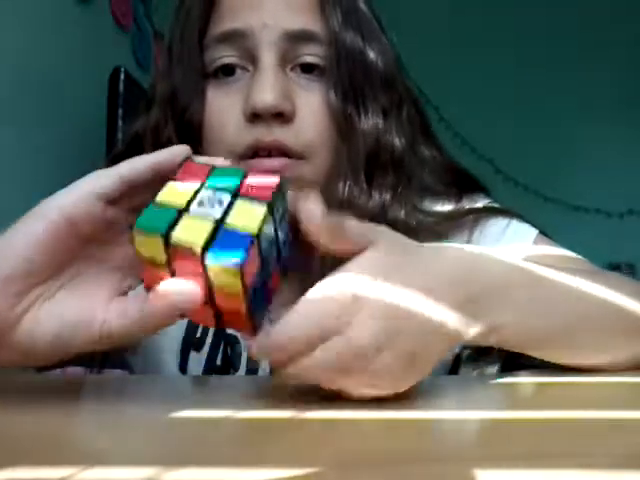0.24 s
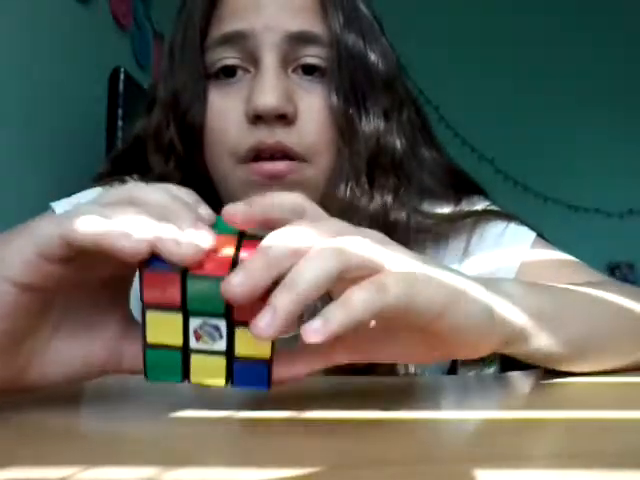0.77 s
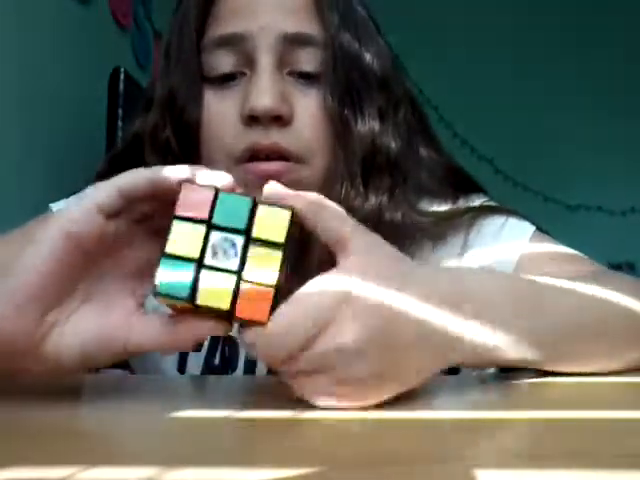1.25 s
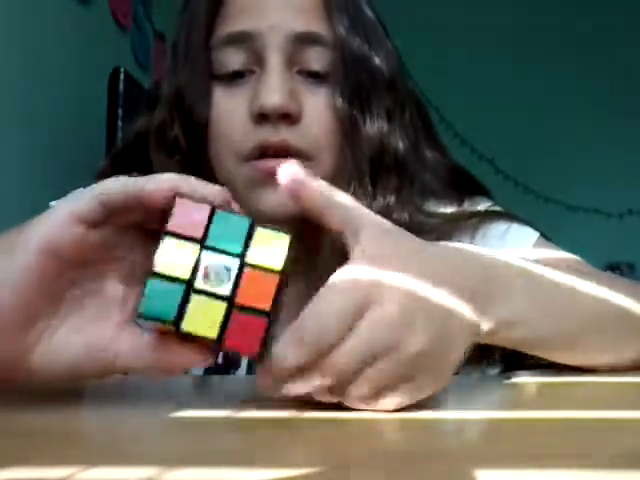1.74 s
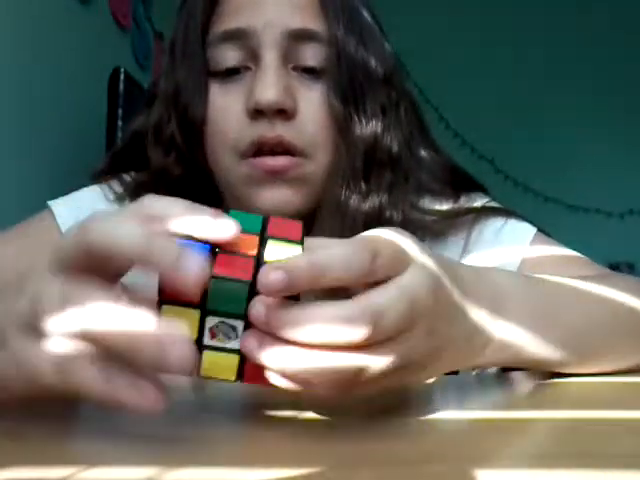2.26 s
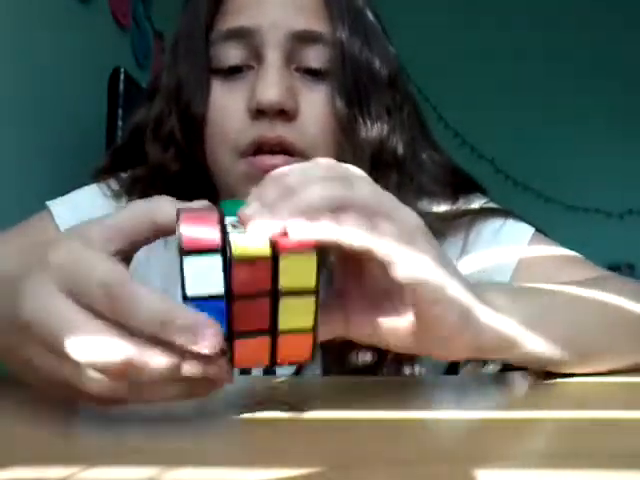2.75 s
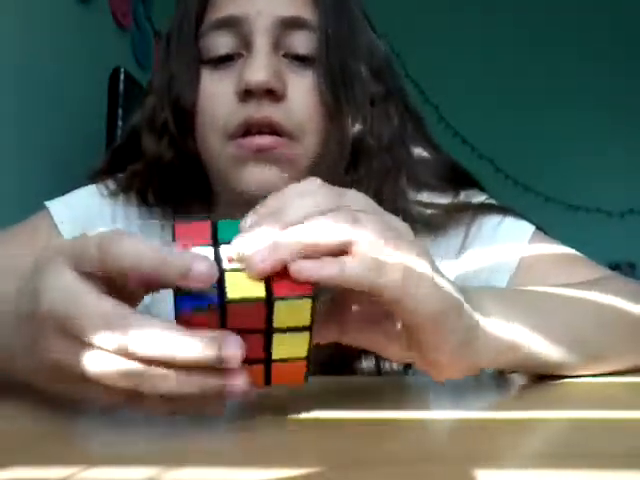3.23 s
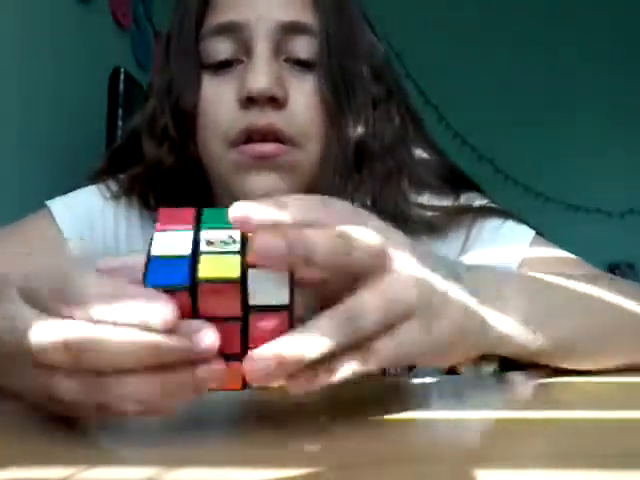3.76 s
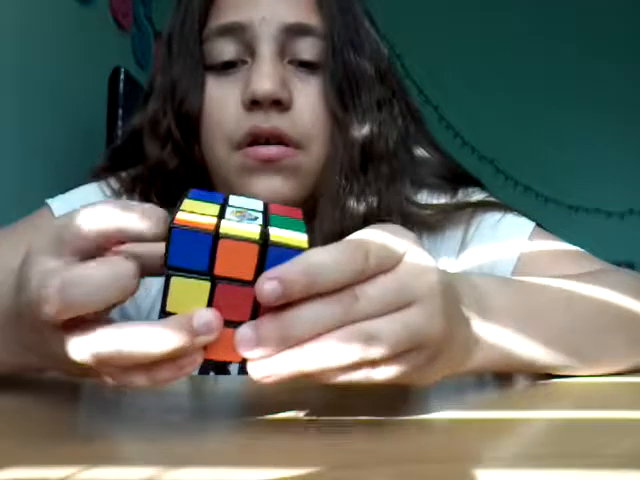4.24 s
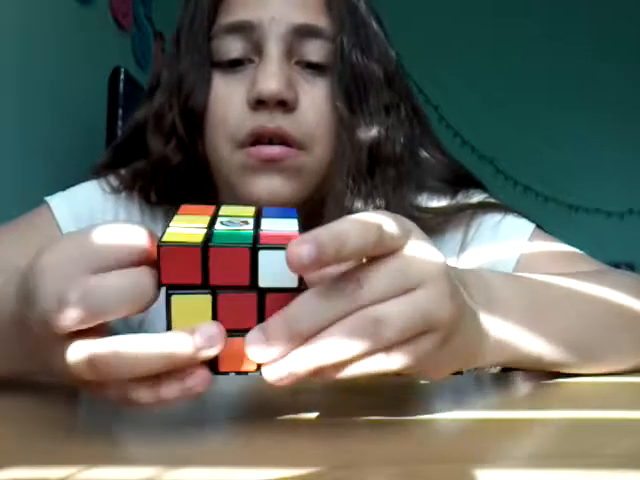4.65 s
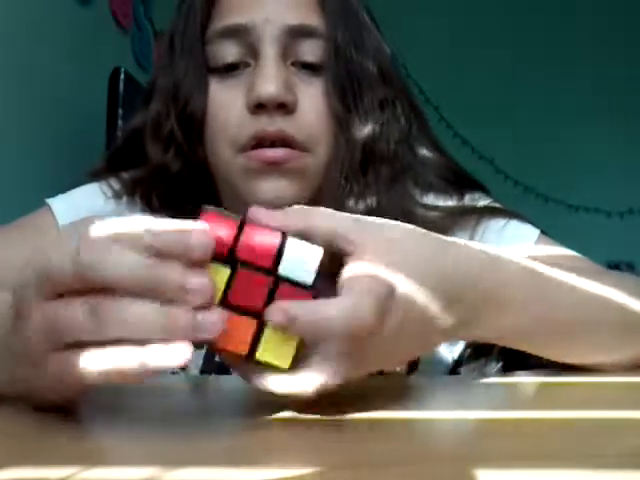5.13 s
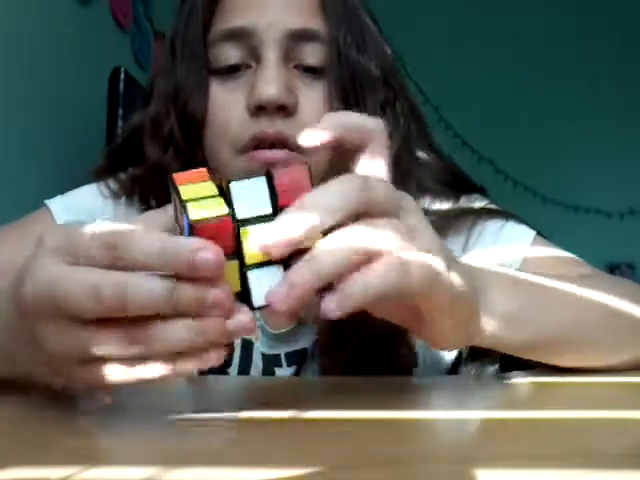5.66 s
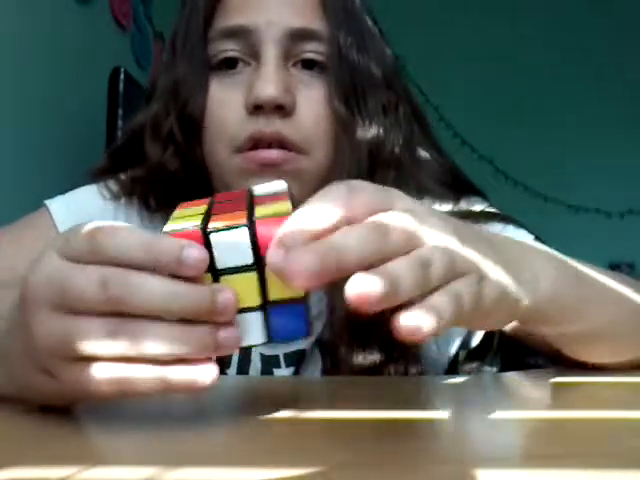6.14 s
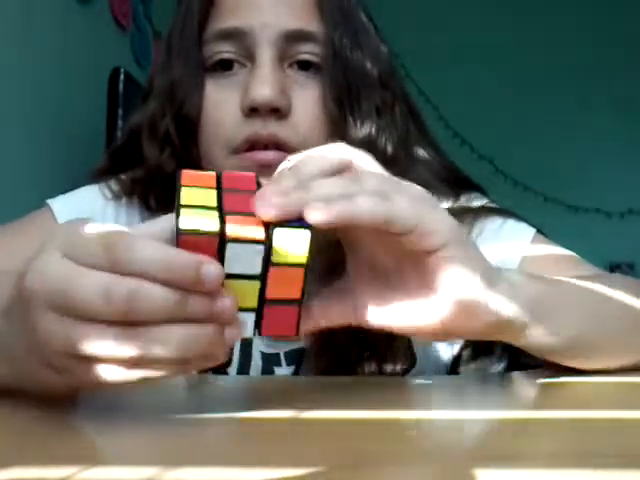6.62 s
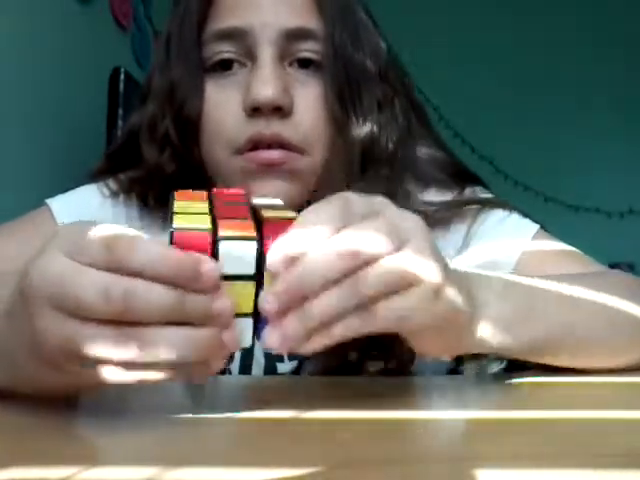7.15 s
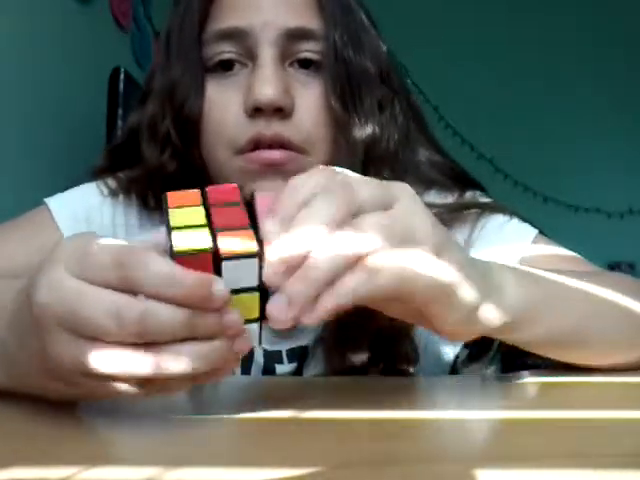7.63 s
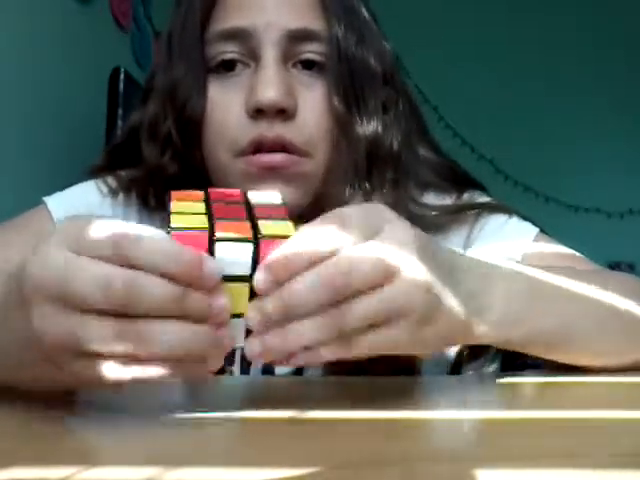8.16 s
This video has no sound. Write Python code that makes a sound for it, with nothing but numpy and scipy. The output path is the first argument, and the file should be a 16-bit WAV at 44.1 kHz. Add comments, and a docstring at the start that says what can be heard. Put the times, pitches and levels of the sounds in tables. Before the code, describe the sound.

In a small bare room with a faint rumble and hiss, a plastic puzzle cube clicks and clacks irregularly as its layers are turned near the microphone. A quick run of snaps comes early, then a dull bump on a wooden table and more turns with short, dry scrapes. After one especially hard clack the handling grows softer, with light ticks and rubs, until a sharp click at the end.

```python
"""In a small bare room, a stiff plastic puzzle cube is twisted by hand just above a wooden table, close to
a laptop's two microphones. In each turn a layer scrapes ever harder by stick-slip friction, catches with
a thin click and seats with a clack, an impact that excites the resonances of the hollow pieces.
During and between turns, pieces click and layers are nudged; soft bumps ring the table's modes under
several clacks and twice between turns. The room reverberates over a faint rumble and hiss."""
import sys
import numpy as np
from scipy import signal
from scipy.fft import rfft, irfft, next_fast_len
from scipy.io import wavfile
from scipy.ndimage import uniform_filter1d

SR = 44100
rng = np.random.default_rng(int(sys.argv[2]) if len(sys.argv) > 2 else 0)


def materialize(psi):
    """Save the field psi as 16-bit PCM at rate SR to the path in sys.argv[1].

    A 1-D psi becomes a single channel; in a 2-D psi each row is a channel.
    """
    bounded = np.clip(np.atleast_2d(psi).T, -1, 1)
    quanta = np.round(bounded * 32767).astype(np.int16)
    wavfile.write(sys.argv[1], SR, quanta)


N = 369999

# full turns of a layer: (seating time [s], slide length [s], slide level [dB], lead of the catch [s],
# catch level [dB], seat level [dB], hollow knock [dB])
TURNS = [(0.1624, 0.16, -45.5, .0049, -27, -28, 9), (1.1425, 0.061, -35.5, .0044, -27, -14, 2.5),
         (1.2982, 0.081, -32.5, .0058, -50, -15.5, 0), (1.5478, .07, -34.5, .0247, -22.5, -18, 5.5),
         (2.7594, .04, -31.5, .0068, -26, -30, 8.5), (3.6667, 0.12, -39, .0064, -19.5, -23, 11),
         (4.2373, .04, -30.5, .0067, -15, -16, 5.5), (4.68, 0.099, -36.5, .0085, -23, -16.5, 10),
         (5.5467, 0.028, -22.5, .0074, -16, -3, 0.5), (5.959, 0.066, -44, .0074, -36, -37.5, 19.5),
         (6.6025, 0.067, -32, .0094, -20.5, -25, 8.5), (7.128, 0.05, -37.5, .0301, -35, -37.5, -8),
         (8.199, 0.054, -43.5, .0187, -42.5, -35, 11.5)]
SWELL_DB = 10  # growth of a slide up to its listed level
def turns(thinning_db=-11.5):
    """Double impact: a layer catches with a thin click, then drops into line with a hollow clack."""
    out = np.zeros((2, N))
    for seat_s, _, _, lead_s, catch_db, seat_db, knock_db in TURNS:
        add(out, seat_s - lead_s, gripped_snap(catch_db, knock_db + thinning_db))
        add(out, seat_s, gripped_snap(seat_db, knock_db))
    return out


def gripped_snap(level_db, knock_db):
    """Contact stiffness: in a held layer, a softer impact excites less treble."""
    return snap(level_db, knock_db, edge_db=6 + 0.27 * level_db)


# impact spectrum of the plastic shell: (frequency [Hz], spectral level [dB])
SHELL_SPECTRUM = [(60, -30.5), (450, -18.5), (680, -12.5), (880, -8.5), (2000, -3.5), (3500, -3),
                  (5000, -1.5), (7300, -4.5), (9500, -15.5), (14500, -25.5)]
def snap(level_db, knock_db, edge_db, contact_t60=0.0036, rattle_t60=0.023, rise_s=0.00086, size=8192):
    """Impact excitation: a hard contact and a brief rattle of neighbouring pieces ring the shell."""
    t, hz = np.arange(size) / SR, np.fft.rfftfreq(size, 1 / SR)
    decay = amp(-60 * t / contact_t60) + amp(-12 - 60 * t / rattle_t60)
    force = rfft(decay * (1 - np.exp(-t / rise_s)) * rng.standard_normal((2, size)))
    # the force's broad trend is divided out, leaving only narrow peaks to chance
    trend_db = 10 * np.log10(uniform_filter1d(np.abs(force) ** 2, 201, axis=1))
    knock_band = along([(550, 0), (850, 1), (1600, 1), (3200, 0)], hz)
    edge_band = along([(6500, 0), (10000, 1)], hz)
    pitch = np.exp(0.041 * rng.standard_normal())  # no two pieces ring alike
    colour_db = along(SHELL_SPECTRUM, hz) + cavities_db(hz, pitch) + ports_db(hz)
    colour_db += knock_db * knock_band + edge_db * edge_band
    crack = unit(irfft(force * minimum_phase(colour_db - trend_db)))
    crack *= np.sqrt(0.005 * SR / size)  # the energy of 5 ms at unit power
    hollowness = 1 / (1 + amp(-knock_db))
    return amp(level_db) * (crack + hollowness * body_ring(t))


# air and wall resonances of the pieces: (frequency [Hz], bandwidth [Hz], gain [dB])
CAVITY_RESONANCES = [(918, 110, 8), (1146, 130, 5.5), (1440, 67, -0.5), (2200, 100, 2.5), (2920, 960, 2)]
def cavities_db(hz, pitch=1):
    """Cavity resonance: the hollow pieces emphasise bands around their natural frequencies."""
    return sum(db * bell(hz, centre * pitch, width) for centre, width, db in CAVITY_RESONANCES)


# modes of the whole cube: (frequency [Hz], relative level [dB], T60 [s])
BODY_MODES = [(890, -21, .05), (1020, -20, .06), (1140, -21, .055)]
def body_ring(t, rise_s=0.0018, gain_db=-2):
    """Damped free vibration: the cube rings on in the hands, its modes slightly detuned by each grip."""
    detunings = 1 + 0.005 * rng.standard_normal(len(BODY_MODES))
    phases = 2 * np.pi * rng.random((len(BODY_MODES), 2, 1))
    ring = sum(amp(db - 60 * t / t60) * np.sin(2 * np.pi * hz * detuning * t + phase)
               for (hz, db, t60), detuning, phase in zip(BODY_MODES, detunings, phases))
    return amp(gain_db) * ring * (1 - np.exp(-t / rise_s))


# clicks of loose pieces: (time [s], level [dB], hollow knock [dB])
LOOSE_CLICKS = [(0.061, -38, 8), (0.0731, -36.5, 1), (.3048, -48.5, 9), (0.3396, -51, 17),
                (.5096, -51, 11.5), (.8319, -28, 1), (1.1034, -29, 2), (1.1085, -28, 3), (1.2302, -33.5, 9),
                (1.2598, -24, -2), (1.2665, -26, 0), (1.2756, -31.5, -10), (1.4025, -33.5, 2),
                (1.4858, -34, 6), (2.058, -47.5, 4), (2.196, -34.5, 8), (2.289, -50.5, -2),
                (2.597, -48, -17), (2.6353, -34, 5), (3.339, -49, 5.5), (3.5601, -35.5, 9),
                (3.5771, -29, 2), (3.6484, -23.5, -13), (3.8692, -49.5, 8), (3.9336, -43, 4),
                (4.124, -42, 0.5), (4.2192, -23, 3), (4.6066, -30.5, 2), (4.9538, -41, 2),
                (5.1591, -45, 16.5), (5.2063, -39.5, 4), (5.2378, -40, 11), (5.4206, -48, -20),
                (5.5214, -26, -5), (6.304, -45, 6.5), (6.541, -31.5, -8), (6.5663, -27.5, -6),
                (7.21, -46.5, 8), (8.323, -14.5, -7.5)]
def loose_pieces():
    """Free impact: undamped by the fingers, a loose piece keeps its treble however softly it clicks."""
    out = np.zeros((2, N))
    for time_s, level_db, knock_db in LOOSE_CLICKS:
        add(out, time_s, snap(level_db, knock_db, edge_db=0.5))
    return out


def snags(per_turn=4, above_slide_db=3, spread_db=1):
    """Glancing impacts: edges of the pieces brush past each other at random moments of each turn."""
    out = np.zeros((2, N))
    for seat_s, length_s, slide_db, *_ in TURNS:
        remaining = (np.arange(per_turn) + rng.random(per_turn)) / per_turn
        for share, scatter_db in zip(remaining, spread_db * rng.standard_normal(per_turn)):
            level_db = slide_db + above_slide_db - SWELL_DB * share + scatter_db
            add(out, seat_s - share * length_s, gripped_snap(level_db, knock_db=5.5))
    return out


# plastic sliding on plastic: (frequency [Hz], spectral level [dB])
FRICTION_SPECTRUM = [(60, -34.5), (600, -8.5), (880, -8), (2000, -7), (3300, -7.5), (5000, -5.5),
                     (7300, -8.5), (9500, -17), (14500, -22)]
# layers nudged without seating: (start [s], end [s], mid-stroke level [dB])
NUDGES = [(-.04, 0.039, -43.5), (0.383, 0.433, -46.5), (0.978, 1.014, -47.5), (1.029, 1.058, -51.5),
          (1.377, 1.458, -44.5), (1.6, 1.804, -52), (1.854, 1.908, -56.5), (2.607, 2.711, -45),
          (2.766, 2.798, -35), (2.919, 2.983, -44.5), (2.982, 3.026, -53.5), (4.158, 4.205, -51),
          (5.193, 5.362, -55.5), (6.725, 6.763, -46), (7.126, 7.165, -44), (7.25, 7.336, -51),
          (7.376, 7.455, -55), (7.714, 7.785, -44.5), (7.827, 7.926, -52), (8.267, 8.3, -52.5)]
def scraping(fade_s=0.0098, overrun_s=0.015, nudge_arch_db=8.5):
    """Friction noise follows pressure: a turn presses ever harder, a nudge swells and eases off."""
    out, t = np.zeros((2, N)), np.arange(N) / SR
    friction = (1 + stick_slip()) * rng.standard_normal((2, N))
    rasp = filtered(friction, lambda hz: amp(along(FRICTION_SPECTRUM, hz) + cavities_db(hz) + ports_db(hz)))
    pressing = lambda progress: SWELL_DB * (progress - 1)
    easing = lambda progress: -nudge_arch_db * (2 * progress - 1) ** 2
    strokes = [(seat_s - length_s, seat_s + overrun_s, db, pressing) for seat_s, length_s, db, *_ in TURNS]
    strokes += [(start, end, db, easing) for start, end, db in NUDGES]
    for start, end, db, shape_db in strokes:
        span = (t > start - fade_s) & (t < end + fade_s)
        inside_s = np.minimum(t[span] - start, end - t[span])
        contact = np.clip((inside_s + fade_s) / (2 * fade_s), 0, 1)
        progress = np.clip((t[span] - start) / (end - start), 0, 1)
        out[:, span] += contact * amp(db + shape_db(progress)) * unit(rasp[:, span])
    return out


def stick_slip(per_s=700, spread_db=4, t60=0.005):
    """Stick-slip force: tiny random contacts of uneven size, each dying in milliseconds."""
    slips = rng.random(N) < per_s / SR
    sizes = amp(spread_db * np.minimum(rng.exponential(size=N), 2.5))
    release = amp(-60 * np.arange(SR // 20) / SR / t60)
    return unit(signal.fftconvolve(slips * sizes, release)[:N])


# modes of the wooden top: (frequency [Hz], relative level [dB], T60 [s])
TABLE_MODES = [(95, -26, .12), (245, -20, .07), (350, -9, .065), (490, -2, .028), (555, 0, .022),
               (805, -12, .04), (1465, -14, .025)]
# soft blows on the table: (time [s], level [dB])
TABLE_BUMPS = [(0.398, -37), (2.1968, -16.5), (3.667, -31.5), (4.236, -55), (4.682, -26.5), (5.546, -27.5)]
def table_bumps(rise_s=0.0022):
    """Plate vibration: soft blows ring the table's modes, a quarter cycle apart at the microphones."""
    out, t = np.zeros((2, N)), np.arange(SR // 4) / SR
    phase = np.array([[0], [np.pi / 2]])
    ring = sum(amp(db - 60 * t / t60) * np.sin(2 * np.pi * hz * t + phase) for hz, db, t60 in TABLE_MODES)
    for time_s, level_db in TABLE_BUMPS:
        add(out, time_s, amp(level_db) * ring * (1 - np.exp(-t / rise_s)))
    return out


# reverberation time: (frequency [Hz], T60 [s])
ROOM_T60 = [(200, .17), (650, .17), (1100, .4), (2000, .43), (6000, .41), (9000, .32), (14000, .23)]
# strength of the reverberation: (frequency [Hz], relative level [dB])
ROOM_SPECTRUM = [(200, -6.5), (650, -1), (1150, -4.5), (3000, -12), (6000, -11), (9000, -8), (14000, -8)]
def room(direct, delay_s=0.0056, early_db=3, early_s=0.037, blocks=24):
    """Reverberation: near walls answer first, then a diffuse tail that varies slightly from moment to moment."""
    out, step = np.zeros((2, N)), N // blocks + 1
    for start in range(0, N, step):
        hz, t, noise = signal.stft(rng.standard_normal((2, SR * 2 // 3)), SR, nperseg=256)
        decay = amp(-60 * t / along(ROOM_T60, hz)[:, None] + early_db * np.exp(-t / early_s))
        decay /= np.sqrt(np.mean(decay ** 2, axis=1, keepdims=True))
        tail = signal.istft(noise * decay * amp(along(ROOM_SPECTRUM, hz))[:, None], SR, nperseg=256)[1]
        tail /= np.sqrt(tail.shape[1])
        add(out, start / SR + delay_s, signal.fftconvolve(direct[:, start:start + step], tail, axes=1))
    return out


# room rumble and microphone hiss: (frequency [Hz], spectral level [dB])
NOISE_SPECTRUM = [(20, -15), (50, -10), (85, -3), (125, 0), (190, -5), (245, -4), (600, -16), (1300, -23.5),
                  (1750, -23.5), (2400, -28), (7000, -30), (14500, -32.5)]
def noise_floor(level_db=-52, airborne=0.28):
    """Stationary noise: steady rumble and hiss, of which only the airborne part rings the ports."""
    response = lambda hz: amp(along(NOISE_SPECTRUM, hz) + airborne * ports_db(hz))
    return amp(level_db) * unit(filtered(rng.standard_normal((2, N)), response))


# microphone ports: (frequency [Hz], bandwidth [Hz], left gain [dB], right gain [dB])
PORT_RESONANCES = [(1863, 200, -3.5, 5), (5576, 420, 3, 5.5), (5963, 770, 0.5, 9.5),
                   (10200, 3300, -0.5, -4.5)]
def ports_db(hz):
    """Port resonance: each opening colours its channel; the right one whistles near 6 kHz."""
    return sum(np.array([[left], [right]]) * bell(hz, centre, width)
               for centre, width, left, right in PORT_RESONANCES)


# response of the two microphones' sum: (frequency [Hz], gain [dB])
SUM_RESPONSE = [(40, -8), (110, -12), (200, -8), (400, -5), (700, -5), (1300, -2.5), (3000, -.5)]
def microphone_pair(left, right):
    """Destructive interference: with opposite polarity, long waves partly cancel in the pair's sum."""
    mid = filtered((left + right) / 2, lambda hz: amp(along(SUM_RESPONSE, hz)))
    side = (left - right) / 2
    return np.array([mid + side, mid - side])


def amp(db):
    return 10 ** (np.asarray(db) / 20)


def unit(x):
    return x / np.sqrt(np.mean(x ** 2) + 1e-20)


def along(points, hz):
    """Interpolation of (frequency [Hz], value) points on a logarithmic axis."""
    frequencies, values = np.transpose(points)
    return np.interp(np.log(hz + 1), np.log(frequencies + 1), values)


def bell(hz, centre_hz, width_hz):
    """Lorentzian resonance curve, 1 at its centre."""
    return 1 / (1 + (2 * (hz - centre_hz) / width_hz) ** 2)


def filtered(x, response):
    """Linear filtering: the spectrum times a frequency response."""
    size = next_fast_len(N + SR // 2)
    return irfft(rfft(x, size) * response(np.fft.rfftfreq(size, 1 / SR)), size)[..., :N]


def minimum_phase(db):
    """Causality: a response with these gains that rings only after the blow."""
    cepstrum = irfft(np.log(amp(db)))
    half = cepstrum.shape[-1] // 2
    cepstrum[..., 1:half] *= 2
    cepstrum[..., half + 1:] = 0
    return np.exp(rfft(cepstrum))


def add(track, time_s, sound):
    """Superposition of a sound on the track."""
    start = max(round(time_s * SR), 0)
    part = track[:, start:start + sound.shape[-1]]
    part += sound[..., :part.shape[1]]


def scene():
    """Superposition: direct sound, reverberation and noise meet at the two microphones."""
    direct = turns() + loose_pieces() + snags() + scraping() + table_bumps()
    return microphone_pair(*(direct + room(direct) + noise_floor()))


def record(dry, cutoff_hz=14750):
    """Clipping and band limiting: peaks stop at full scale, then a steep low-pass cuts the top."""
    return filtered(np.clip(dry, -1, 1), lambda hz: 1 / (1 + (hz / cutoff_hz) ** 120))


dry = scene()
out = record(dry)
materialize(out)
```